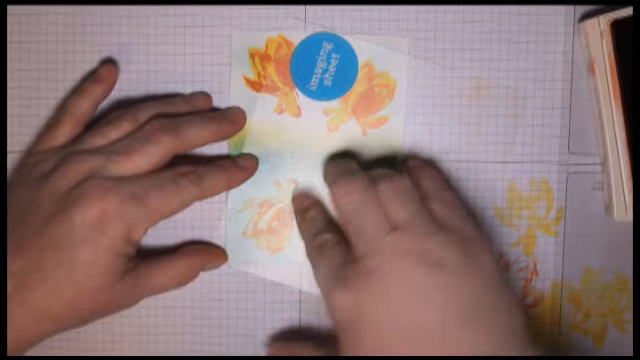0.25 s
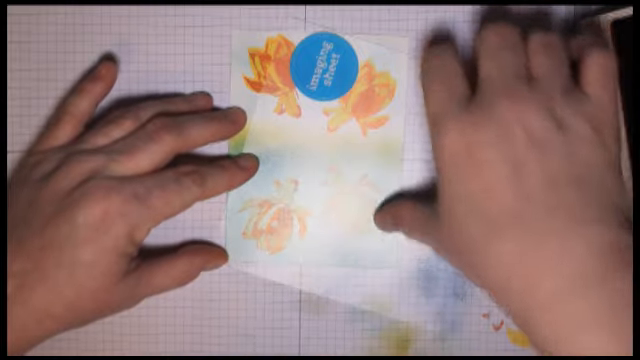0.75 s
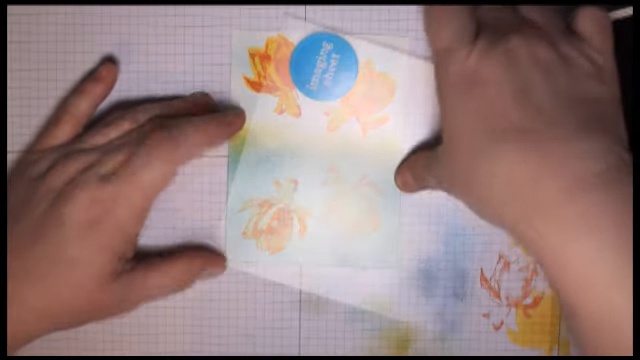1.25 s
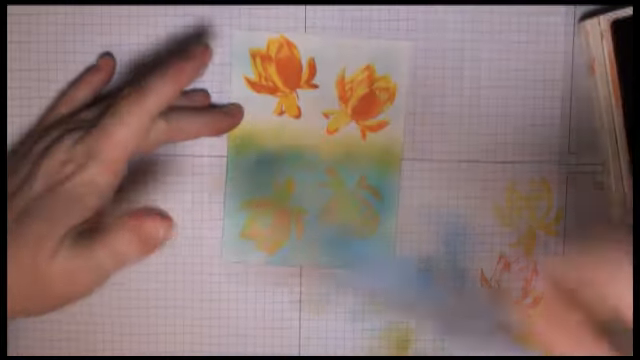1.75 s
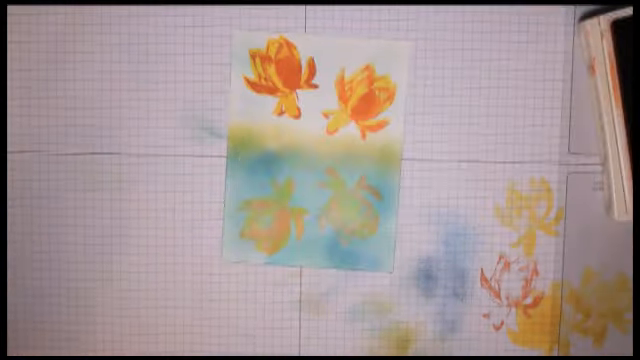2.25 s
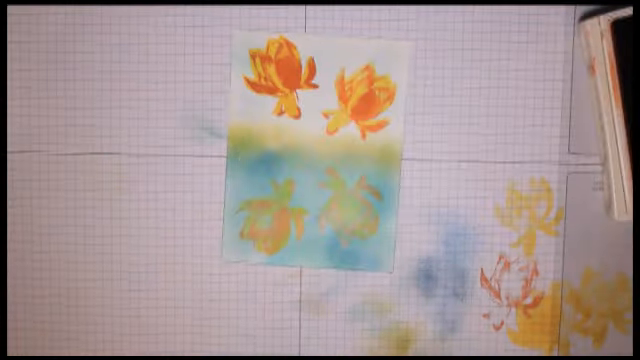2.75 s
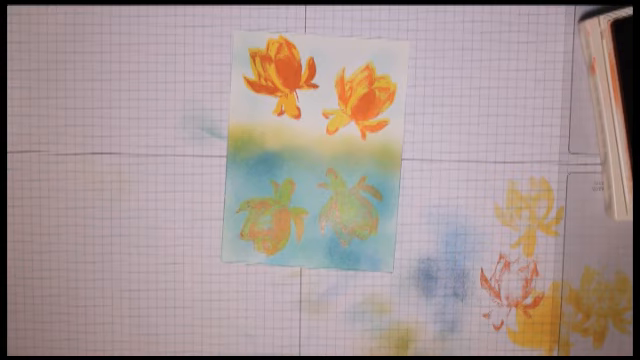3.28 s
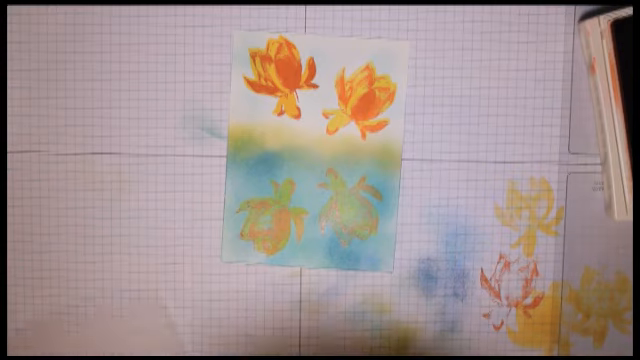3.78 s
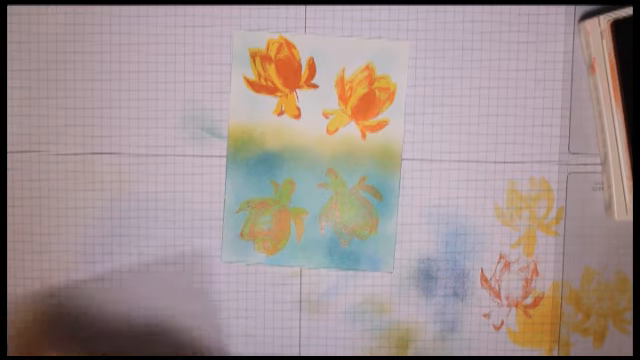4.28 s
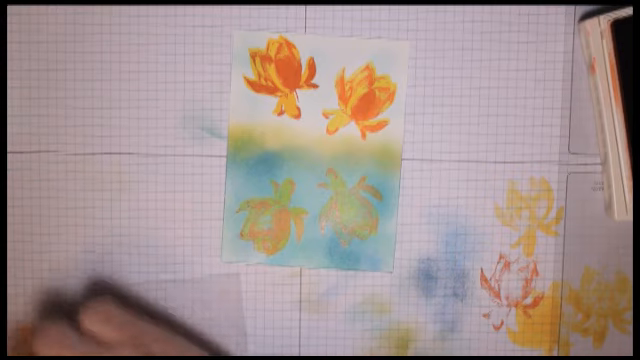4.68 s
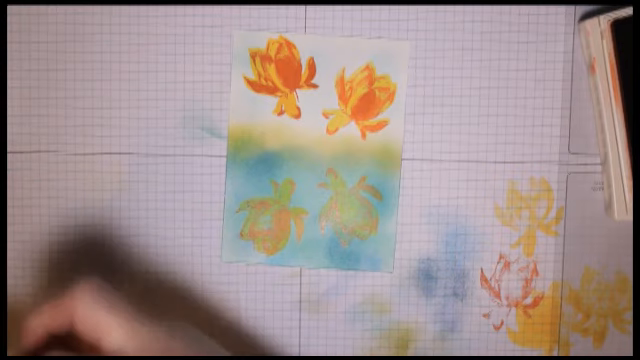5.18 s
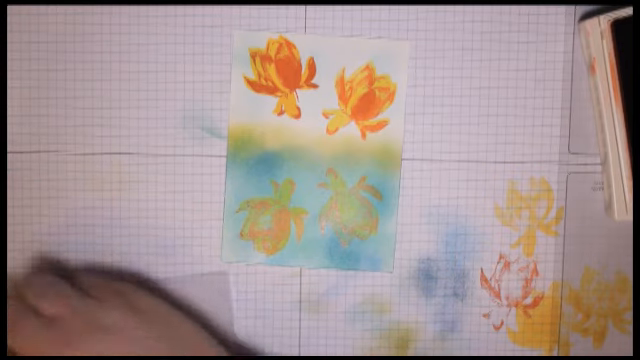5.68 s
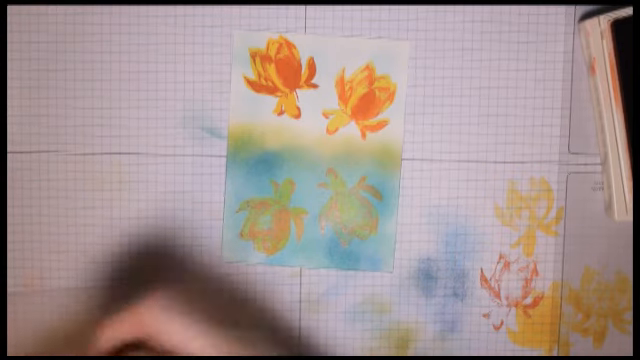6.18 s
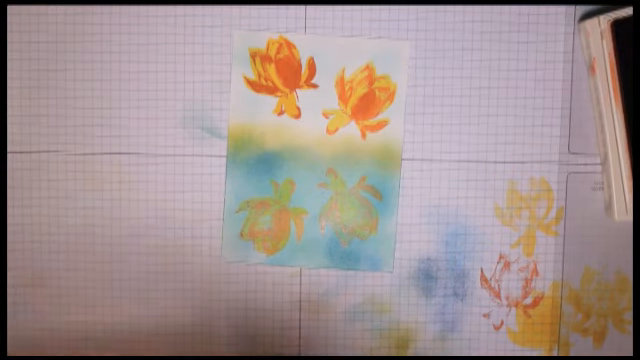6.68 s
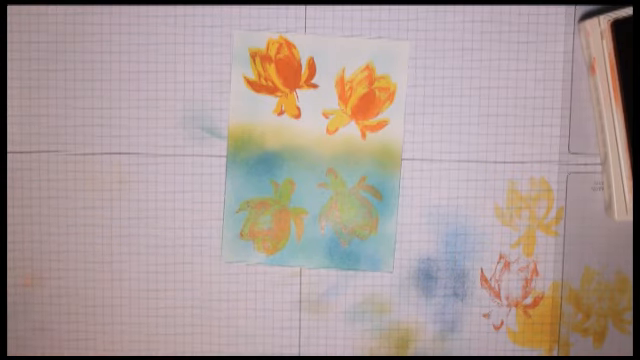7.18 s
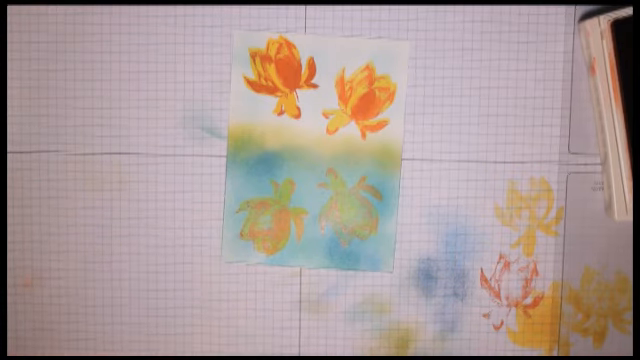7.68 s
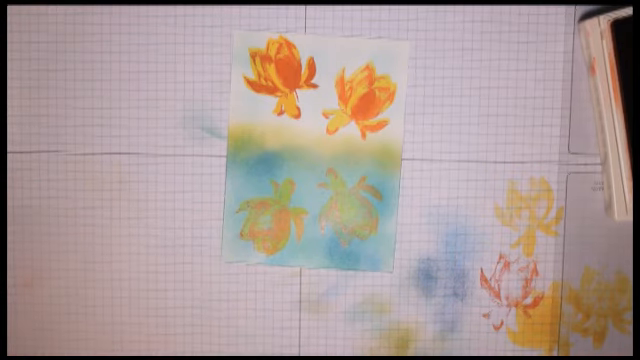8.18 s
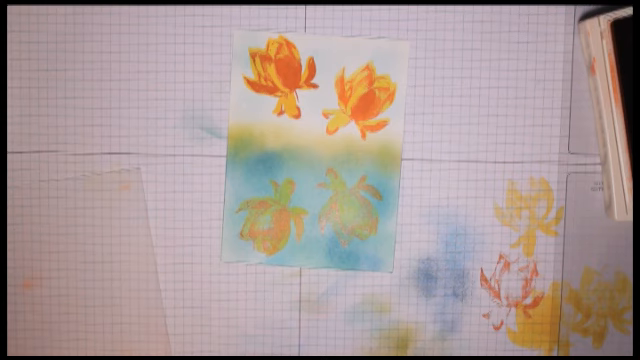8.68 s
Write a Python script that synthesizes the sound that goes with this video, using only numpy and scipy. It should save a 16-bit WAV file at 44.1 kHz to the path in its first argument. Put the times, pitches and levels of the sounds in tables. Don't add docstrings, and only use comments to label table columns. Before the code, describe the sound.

Dry film rustles, ticks and soft knuckle thuds over a faint fan hum, ending with a block set down twice on a hollow tabletop.

```python
import sys
import numpy as np
from scipy import signal
from scipy.fft import rfft, irfft
from scipy.io import wavfile
from scipy.ndimage import uniform_filter1d

SR = 44100
rng = np.random.default_rng(int(sys.argv[2]) if len(sys.argv) > 2 else 0)


def wav_record(signal):
    frames = np.transpose(np.atleast_2d(signal))
    bounded = np.clip(frames, -1, 1)
    quanta = np.round(bounded * 32767).astype(np.int16)
    wavfile.write(sys.argv[1], SR, quanta)


def natural_amplitude(level_db):
    exponent = np.asarray(level_db, float) / 20
    return 10 ** exponent


N = 394232


def unit(x):
    return x / np.sqrt(np.mean(x ** 2))


def fade(seconds, t60):
    return np.exp(-np.log(1000) * seconds / t60)


def ring(x, hz, width_hz):
    return signal.lfilter(*signal.iirpeak(hz, hz / np.clip(width_hz, .5, 9000), fs=SR), x)


def steep(x, hz, width_hz):
    return unit(ring(ring(x, hz, width_hz), hz, width_hz))


def add(out, s, sound):
    i = int(s * SR)
    out[i:i + len(sound)] += sound[:N - i]


def walk(rate):
    k = int(SR / rate)
    held = np.repeat(rng.standard_normal(N // k + 1), k)
    return 1.316 * uniform_filter1d(uniform_filter1d(held, k), k)[:N]


def swell_db(t, s, rise, fall):
    edge_db, roundness = -9.5, 1.43
    return edge_db * np.where(t < s, (s - t) / rise, (t - s) / fall) ** roundness


# pitch_hz, level_db (per Hz)
AIR_COLOUR = [(20, -37), (45, -12), (70, -15.5), (100, 2.5), (125, -7.5), (150, -4), (200, -5.5), (250, -1),
              (360, -10), (560, -7), (1000, -13), (2000, -16), (5000, -29), (12000, -23.5)]
# pitch_hz, level_db (rms), wander_hz
HUM_TONES = [(98.9, -68, 7.12), (118.5, -64, 2.87), (174.8, -59, 1.16), (195.4, -66, 1.85),
             (241.5, -62.5, 5.06), (281, -72.5, 4.1), (573, -69, 30)]


def air(level_db=-54):
    hz = np.fft.rfftfreq(N, 1 / SR)
    colour_hz, colour_db = np.transpose(AIR_COLOUR)
    colour = natural_amplitude(np.interp(np.log(hz + 1), np.log(colour_hz), colour_db))
    rush = unit(irfft(rfft(rng.standard_normal(N)) * colour, N))
    out = rush * natural_amplitude(level_db + .5 * walk(3.4))
    for tone_hz, db, wander_hz in HUM_TONES:
        phase = 2 * np.pi * np.cumsum(tone_hz + wander_hz / 2 * walk(9)) / SR
        out = out + np.sqrt(2) * natural_amplitude(db + 2.6 * walk(6)) * np.sin(phase)
    return out


# centre_hz, span_octaves
RUB_COLOURS = [
    (720, 1.7),
    (2000, 1.2),
    (4400, 1.1),
    (9000, .9),
]
# time_s, level_db
SLEEVE_LEVELS = [(0, -71), (.5, -68.5), (1.0, -65.5), (1.35, -70), (1.7, -72.5), (2.1, -64), (2.35, -67.5),
                 (2.65, -67), (3.4, -67), (4.0, -71.5), (4.7, -65), (5.4, -67.5), (6.0, -64.5),
                 (6.3, -69.5), (7.0, -64), (7.6, -68.5), (8.35, -69), (8.94, -66.5)]
# drag_db, rustle_db, hiss_db, sizzle_db
SLEEVE_COLOUR = (5.8, 1, 8.4, 1.6)
# peak_s, rise_s, fall_s, level_db, brightness_db (per octave)
PRESS_STROKES = [(.09, 0.068, 0.05, -57, -0.5), (.27, 0.022, 0.022, -55, 1),
                 (.315, 0.0092, 0.012, -48, 2.5), (.57, 0.0067, .01, -58.5, 6),
                 (.705, 0.019, 0.035, -42, -1.5), (.83, 0.05, 0.043, -45, -1), (1.11, 0.008, 0.018, -59, 4),
                 (1.162, 0.005, 0.073, -51, 4), (1.505, 0.002, 0.023, -43, 1),
                 (1.545, 0.04, 0.08, -47, 1.5), (1.63, 0.013, 0.022, -46, 0.5),
                 (1.82, 0.31, 0.15, -57.5, 4), (2.723, 0.019, 0.013, -45.5, 6),
                 (2.784, 0.012, 0.0079, -45, 4), (2.83, 0.03, 0.05, -59, 3),
                 (2.96, 0.097, 0.058, -60.5, -0.5)]
LAY_STROKES = [(3.09, 0.031, 0.061, -54, 0.55), (3.203, 0.01, .015, -52, 0), (3.26, 0.074, 0.1, -52.5, 1.8),
               (3.45, 0.012, 0.029, -59, 3), (3.56, 0.053, 0.13, -50, -0.6), (3.655, .025, 0.031, -49, 2.5),
               (3.69, .12, 0.11, -52.5, -1), (3.76, 0.067, 0.1, -49.5, 0.5),
               (3.885, 0.024, 0.022, -55.5, 3), (3.925, 0.028, 0.058, -48, -0.5),
               (4.05, 0.063, 0.051, -48, -1.7), (4.12, .03, .03, -60, 1.1),
               (4.16, 0.027, 0.041, -49.5, 0.5), (4.235, 0.05, 0.094, -47.5, -0.7),
               (4.35, 0.0052, 0.042, -53.5, 0.22), (4.445, 0.014, 0.061, -51, -2)]
WIPE_STROKES = [(4.64, 0.0082, 0.27, -63.5, 5), (4.88, 0.036, 0.058, -52.5, 0), (5.01, 0.036, .02, -58, 0),
                (5.09, 0.011, 0.06, -57.5, 3), (5.19, 0.037, 0.023, -57.5, 2.5), (5.32, .04, 0.054, -52, 0),
                (5.48, 0.029, 0.054, -55.5, -6.5), (5.63, 0.083, 0.085, -60, 1.5),
                (5.795, 0.048, 0.063, -49, 1.5), (5.9, .01, 0.012, -54.5, 2),
                (6.03, 0.032, 0.051, -56.5, -3), (6.16, 0.034, 0.034, -56, 0.5),
                (6.39, 0.068, 0.061, -54, 1), (6.485, 0.042, 0.028, -48, 1.5),
                (6.73, 0.099, 0.12, -57, -1.5), (6.87, 0.026, 0.034, -44.5, 1.5),
                (7.08, 0.03, 0.032, -52.5, 5)]
TIDY_STROKES = [(7.22, 0.03, 0.027, -60, -6), (7.305, 0.055, 0.051, -44, -1.5),
                (7.315, 0.018, 0.038, -50.5, 10), (7.36, 0.028, 0.032, -39.5, -2),
                (7.44, 0.023, 0.04, -52.5, -4), (7.7, 0.034, 0.039, -46, 0.5),
                (7.968, 0.0092, 0.036, -40.5, -0.5), (8.03, 0.036, 0.032, -57, -2),
                (8.09, 0.035, 0.026, -44, 0), (8.17, 0.074, 0.097, -47.5, -0.5),
                (8.235, 0.015, 0.021, -47.5, 2.5), (8.52, 0.1, 0.067, -59, 1),
                (8.64, 0.068, 0.023, -59.5, 6), (8.76, 0.032, 0.024, -57, -1),
                (8.92, 0.14, .03, -58.5, 0.5)]


def friction():
    t = np.arange(0, N / SR, .002)
    octave = np.log2(np.array(RUB_COLOURS)[:, :1] / 4400)
    sleeves_db = np.interp(t, *np.transpose(SLEEVE_LEVELS))
    power = natural_amplitude(sleeves_db + np.reshape(SLEEVE_COLOUR, (4, 1))) ** 2
    activities = ((PRESS_STROKES, (-1, 1, 0, -1)), (LAY_STROKES, (-11.5, 0, 0, 2)),
                  (WIPE_STROKES, (-12.5, -1.5, 0.5, 0.5)), (TIDY_STROKES, (-9, -0.5, 2.5, 0)))
    for strokes, colour_db in activities:
        for s, rise, fall, db, tilt_db in strokes:
            stroke_db = db + swell_db(t, s, rise, fall)
            power = power + natural_amplitude(stroke_db + np.reshape(colour_db, (4, 1)) + tilt_db * octave) ** 2
    return t, 10 * np.log10(power)


# pitch_hz, width_hz, level_db
SHEET_MODES = [(700, 29, 1.5), (1500, 420, -5), (2880, 150, -15), (4030, 140, 1), (5170, 250, -3)]
# time_s, level_db
PRESSED_LEVELS = [(.66, -40), (.69, -13), (.765, -16), (.86, -13), (.9, -40)]


def rubbing(grain_db=2.5, patchy_db=2.2, hush_db=-40):
    s, colours_db = friction()
    centres, octaves = np.transpose(RUB_COLOURS)
    density_db = colours_db.T - 10 * np.log10(octaves)
    t = np.arange(N) / SR
    catch_db = grain_db * np.minimum(rng.exponential(size=N), 6)
    grains = natural_amplitude(catch_db + 1.45 * walk(55))
    pressed = natural_amplitude(np.interp(t, *np.transpose(PRESSED_LEVELS)))
    out = 0
    for hz in 450 * 2 ** np.arange(0, 4.9, 1 / 3):
        film = steep(grains * rng.standard_normal(N), hz, hz / 3)
        squeak = sum(natural_amplitude(g) * ring(film, f, w) * np.sqrt(hz / w)
                     for f, w, g in SHEET_MODES if abs(np.log2(f / hz)) < 1 / 6)
        shares = [np.interp(np.log(hz), np.log(centres), share) for share in np.eye(4)]
        level = natural_amplitude(np.interp(t, s, density_db @ shares) + patchy_db * walk(22))
        out = out + (film * natural_amplitude(hush_db * pressed) + pressed * squeak) * level
    return natural_amplitude(-7) * out


# start_s, peak_db, low_mode_hz, t60_s, body_db
THUD_HITS = [(0.308, -41, 251, 0.077, -7), (1.19, -42.5, 248, 0.15, -2.5), (1.85, -45, 267, 0.37, -17),
             (2.027, -34.5, 95, 0.045, -6.5), (2.399, -42, 81, 0.1, -24), (2.808, -45.5, 177, 0.13, -7.5),
             (3.798, -38.5, 105, 0.24, -20), (4.146, -42.5, 124, 0.28, -16), (4.242, -34.5, 135, 0.087, -8),
             (4.251, -39.5, 270, 0.14, -5), (5.45, -44, 115, 0.11, -20), (6.332, -37.5, 137, 0.13, -15),
             (6.498, -40.5, 110, 0.087, -0.5), (6.903, -36.5, 206, 0.13, 0), (7.263, -26.5, 154, 0.15, -9),
             (7.319, -22.5, 297, 0.041, -4), (7.438, -36, 255, 0.083, 11.5), (7.969, -37, 141, 0.064, -6),
             (8.206, -37, 113, 0.22, -9.5)]


def thuds(rise_s=0.0024, body_hz=408):
    out, t = np.zeros(N), np.arange(int(.3 * SR)) / SR
    for s, db, hz, t60, body_db in THUD_HITS:
        body = steep(rng.standard_normal(len(t)), body_hz, 0.76 * body_hz)
        swing = np.sin(2 * np.pi * hz * t) + natural_amplitude(body_db) * body
        add(out, s, natural_amplitude(db) * swing * (1 - np.exp(-t / rise_s)) * fade(t, t60))
    return out


# start_s, peak_db, ring_hz, breadth (share of ring_hz), rustle_db
EDGE_TICKS = [(0.31, -34.5, 1130, 0.87, -11), (0.57, -33, 3790, 0.92, -25),
              (1.191, -26.5, 1600, 1.3, -11.5), (1.464, -46, 1800, .5, -12), (1.5015, -21, 1500, 2.6, -21),
              (1.842, -38.5, 3630, 0.8, -9), (2.026, -31.5, 1840, 1.2, -14), (2.712, -34, 2140, .8, -6),
              (3.349, -37.5, 1760, 1.3, -11), (3.531, -35, 2370, 1.4, -11), (3.567, -40, 2500, 2, -16),
              (3.635, -34, 3000, 2.5, -18), (3.801, -33, 4000, 2, -15), (3.974, -32, 4000, 2.5, -21),
              (4.015, -36, 9000, .6, -8), (4.175, -38, 3000, 2.3, -16), (4.474, -34.5, 1230, 1.2, -9),
              (5.815, -40.5, 1910, 0.8, 2.5), (6.6425, -43, 1770, 1, -9), (7.148, -33, 3600, 0.6, -16),
              (7.948, -28.5, 2370, 0.85, -29), (7.9638, -14.5, 3000, 1.9, -19.5),
              (8.606, -32.5, 1040, 0.91, -15)]
FILM_SNAPS = [(1.396, -35, 2300, 0.58, -3), (1.3965, -38.5, 6500, 0.6, -10), (2.6885, -23, 7000, 1.2, -9),
              (2.7685, -27, 6000, 1.3, -22), (2.784, -38, 1690, .8, -12), (4.1525, -37, 4000, 2.5, -30),
              (7.3215, -22, 1900, 0.51, 0.5)]
NAIL_SCRAPES = [(4.353, -34.5, 3060, 1.1, -16), (7.1725, -30, 2860, 3.9, -10.5),
                (7.263, -27, 980, 0.87, -12.5)]


def ticks(late_s=0.000976):
    out, t = np.zeros(N), np.arange(int(.2 * SR)) / SR
    for rows, rustle_t60 in ((EDGE_TICKS, 0.058), (FILM_SNAPS, 0.037), (NAIL_SCRAPES, 0.13)):
        for s, db, hz, breadth, rustle_db in rows:
            noise = rng.standard_normal((2, len(t)))
            snap = noise[0] * fade(t, .008) / 8
            snap[0] = -1
            snap = ring(snap, hz, hz * breadth)
            rustle = steep(noise[1], hz, 1.03 * hz * breadth) * fade(t, rustle_t60)
            add(out, s + late_s, natural_amplitude(db) * (snap / np.abs(snap).max() + natural_amplitude(rustle_db) * rustle))
    return out


# peak_s, rise_s, fall_s, level_db, pitch_hz
FOLD_CREASES = [(.848, 0.01, 0.019, -47.5, 1410), (1.551, 0.038, 0.04, -50.5, 1770),
                (1.618, 0.0049, 0.023, -46, 1090), (1.629, 0.0087, .009, -40.5, 3830),
                (1.649, .004, .004, -47, 3500), (3.084, 0.031, 0.026, -53, 4200),
                (3.655, .02, .02, -48, 10500), (4.05, .03, .02, -52, 5500), (3.93, .015, 0.029, -45, 9700),
                (5.79, 0.044, 0.033, -51, 5430), (6.335, 0.014, 0.018, -52.5, 2450),
                (7.176, 0.003, 0.023, -38.5, 1990), (7.176, 0.0026, 0.012, -34, 4200),
                (7.685, 0.017, .02, -48.5, 2270), (8.173, .008, .006, -47, 2000),
                (8.19, 0.01, 0.014, -42, 2070), (8.226, 0.013, 0.012, -44.5, 4200)]
FILM_SQUEAKS = [(.7, .012, .03, -50, 2900), (.708, .015, .025, -55, 4000), (.72, .025, .025, -52, 1600),
                (.715, .02, .02, -59, 5400), (.7, .01, .04, -52, 700), (.797, .008, .012, -55, 2900),
                (.82, .03, .025, -57, 4000), (.825, .015, .02, -50, 5300), (.85, .008, .01, -52, 1900),
                (.82, .008, .025, -51, 700), (.832, .01, .012, -56, 2900), (.8, .012, .02, -55, 1500),
                (.845, .01, .012, -54, 2300), (.85, .012, .015, -50, 340), (1.545, .025, .015, -48, 1900),
                (1.571, .004, .004, -48, 1600)]
FILM_CRACKLES = [(1.464, .003, .004, -51, 1900), (1.47, .003, .003, -55, 2600),
                 (3.181, .003, .003, -51, 9500), (3.2, .005, 0.019, -51, 3600),
                 (3.2, .006, .012, -52, 4600), (3.243, .006, .004, -47, 9000),
                 (3.265, .008, .012, -53, 9300), (3.27, .01, .015, -53, 3500),
                 (3.352, .004, .006, -48.5, 11000), (3.352, .004, .005, -52, 3000),
                 (4.862, .005, .01, -56, 4400), (4.885, .02, .02, -57, 3600), (4.89, .015, .01, -55, 6000),
                 (5.005, .01, .025, -55.5, 1700), (6.648, .003, .012, -50, 3320),
                 (6.646, .002, .014, -54, 1700), (6.67, .025, .06, -58, 11000),
                 (7.18, .008, .015, -49, 10800), (7.19, 0.0073, 0.014, -39, 4100),
                 (7.185, 0.011, .015, -45.5, 5140), (7.187, .008, .015, -43, 1890),
                 (8.11, .04, .05, -54, 4300), (8.24, .012, .012, -47, 2900)]


def creases():
    out, t = np.zeros(N), np.arange(-4000, 4000) / SR
    for rows, breadth in ((FOLD_CREASES, .26), (FILM_SQUEAKS, .12), (FILM_CRACKLES, .26)):
        for s, rise, fall, db, hz in rows:
            band = steep(rng.standard_normal(len(t)), hz, breadth * hz)
            add(out, s + t[0], band * natural_amplitude(db + swell_db(t, 0, rise, fall)))
    return out


# start_s, peak_db, pitch_hz, contact_s
CONTACT_MODES = [
    (1.3955, -33, 1190, .005),
    (1.3957, -37, 2130, .004),
    (1.396, -37, 2500, .004),
    (1.396, -40, 3600, .004),
    (7.3171, -9.5, 640, .0045),
    (7.32, -7, 1180, .0046),
    (7.3215, -16, 760, .003),
    (7.3228, -18, 1750, .003),
]


def landing():
    out = np.zeros(N)
    for s, db, hz, contact in CONTACT_MODES:
        t = np.arange(int(contact * SR)) / SR
        swell = np.sqrt(np.sin(np.pi * t / contact))
        add(out, s, -natural_amplitude(db) * np.sin(2 * np.pi * hz * t) * swell)
    return out


# start_s, peak_db, pitch_hz, rise_s, t60_s
TOP_RINGS = [(1.5024, -27, 900, .0004, 0.014), (2.0268, -28, 500, 0.00088, 0.019),
             (4.48, -44, 330, .003, .1), (4.253, -38, 402, .003, 0.14), (6.905, -40, 400, .003, 0.13),
             (6.91, -46, 220, .003, 0.1), (7.263, -33, 570, 0.001, 0.11), (7.316, -40, 45, .004, 0.16),
             (7.319, -24, 294, 0.0018, 0.049), (7.44, -26, 378, .003, 0.083), (7.441, -39, 91, .004, .15),
             (7.3175, -16.5, 368, 0.0023, 0.049), (7.375, -27, 1210, .003, .08),
             (7.3253, -19, 1200, 0.0022, 0.056), (7.439, -15, 1130, 0.0024, 0.045),
             (7.44, -19, 750, .003, 0.059), (7.453, -22, 1130, .004, .07), (7.462, -26.5, 490, 0.0049, .16),
             (7.445, -19, 520, .002, .04), (7.474, -23, 780, .003, .07), (7.512, -30, 1050, .004, .09),
             (7.508, -33, 740, .006, 0.12), (7.533, -33, 1204, .003, 0.045)]
STIFF_FILM_RINGS = [(1.399, -42, 1194, .001, .04), (6.6432, -35, 2600, .0003, .01),
                    (2.6935, -24, 700, .0002, .006), (2.6952, -28, 2000, .0002, .005),
                    (2.6983, -29, 600, .0002, .007), (2.7128, -28, 2000, .0003, .008),
                    (2.7142, -29, 800, .0003, .008), (2.7692, -29, 1000, .0002, .006),
                    (2.7692, -29, 4600, .0002, .005), (2.7847, -27, 1300, .0002, .005),
                    (2.7847, -30, 3300, .0002, 0.0045), (4.475, -40, 1700, .0005, .02),
                    (7.149, -38, 4500, .0005, .02), (7.1728, -27, 4330, .0003, .012),
                    (7.2632, -30, 1000, .0003, .015)]
# start_s, peak_db, contact_s, ring_db
SHEET_SLAP = (2.6897, -6, .00024, -27)
# pitch_hz, level_db, t60_s
SLAP_MODES = [(247, -8, 0.13), (462, -6, 0.11), (710, -2, 0.07), (970, 5, 0.014), (1060, 3, 0.03),
              (1810, 1, 0.031), (2040, -4, 0.065), (2180, -13, 0.055), (2300, -2, 0.053), (3710, -7, 0.041)]


def rings():
    out, t = np.zeros(N), np.arange(int(.25 * SR)) / SR
    for s, db, hz, rise, t60 in [*TOP_RINGS, *STIFF_FILM_RINGS]:
        swell = (1 - np.exp(-t / rise)) * fade(t, t60)
        add(out, s, -natural_amplitude(db) * np.sin(2 * np.pi * hz * t) * swell)
    s, db, contact, ring_db = SHEET_SLAP
    push = -np.sin(np.pi * np.clip(t / contact, 0, 1)) ** 2
    modes = sum(natural_amplitude(g) * np.sin(2 * np.pi * hz * t) * fade(t, decay) for hz, g, decay in SLAP_MODES)
    push = push + natural_amplitude(ring_db) * signal.fftconvolve(push, modes)[:len(t)] / (contact * SR / 2)
    no_bass = signal.butter(2, 220, "highpass", fs=SR, output="sos")
    add(out, s, natural_amplitude(db) * signal.sosfilt(no_bass, push))
    return out


# start_s, peak_db, sweep_start_hz, sweep_end_hz, sweep_s
BLOWS = [
    (2.6892, -40, 800, 900, 0.0007),
    (7.3215, -22, 1600, 3000, 0.003),
    (7.4395, -18, 550, 1290, 0.0069),
]
# level_db, t60_s
BLOW_RATTLES = [
    (-21, 0.013),
    (-19.5, 0.085),
    (-23, 0.065),
]
# pitch_hz, level_db, t60_s
FIRST_BLOW_MODES = [(145, 3, 0.062), (394, 3, 0.13), (487, -9, 0.14), (655, 3.5, 0.15), (850, -25, 0.25),
                    (950, -5, .2), (1210, -4, 0.29), (1500, -6, 0.15), (1770, 1.5, 0.09),
                    (2196, -3.5, 0.12), (2500, -8, 0.14), (2860, -12, 0.087)]
SECOND_BLOW_MODES = [(248, -8, 0.17), (415, 3, 0.088), (494, 4, 0.2), (613, 3.5, 0.2), (734, 3, 0.28),
                     (970, -11, 0.71), (1060, 1.5, 0.26), (1145, 1.5, 0.33), (1380, -4.5, 0.29),
                     (1425, -8, 0.3), (1760, 5, 0.047)]


def knocks(broad_db=-1, rough_hz=170, dead_hz=922, dead_width_hz=430):
    out, t = np.zeros(N), np.arange(int(.5 * SR)) / SR
    mode_sets = (SLAP_MODES, FIRST_BLOW_MODES, SECOND_BLOW_MODES)
    for blow, modes, (rattle_db, t60) in zip(BLOWS, mode_sets, BLOW_RATTLES):
        s, db, start_hz, end_hz, length = blow
        part = np.clip(t / length, 0, 1)
        pitch = start_hz * (end_hz / start_hz) ** part
        sweep = -np.sin(2 * np.pi * np.cumsum(pitch) / SR) * np.sin(np.pi * part)
        if start_hz < dead_hz:
            sweep = sweep - ring(sweep, dead_hz, dead_width_hz)
        noise = rng.standard_normal(2 * len(t))
        rattle = sum(natural_amplitude(g) * steep(noise, hz, rough_hz)[len(t):] * fade(t, decay)
                     for hz, g, decay in modes)
        rattle = rattle + natural_amplitude(broad_db) * steep(noise, 1770, 660)[:len(t)] * fade(t, t60)
        add(out, s, natural_amplitude(db) * sweep + natural_amplitude(rattle_db - 9.0) * rattle * part)
    return signal.sosfilt(signal.butter(3, (70, 3100), "bandpass", fs=SR, output="sos"), out)


def room(x, t60_s=0.5, level_db=-18.5):
    t = np.arange(int(.5 * SR)) / SR
    tail = ring(rng.standard_normal(len(t)), 630, 6300) * fade(t, t60_s) * (t > .004)
    tail = tail / np.sqrt(np.sum(tail ** 2))
    return x + natural_amplitude(level_db) * signal.fftconvolve(x, tail)[:N]


def scene():
    hits = ticks() + knocks() + thuds() + rings() + landing()
    mono = room(hits) + rubbing() + air() + creases()
    return np.array([mono, mono])


def roll_off(x):
    return signal.sosfilt(signal.butter(12, 13050, fs=SR, output="sos"), x)


def record(dry, top_hz=11850, flicker_hz=12030, leak_db=22):
    treble_band = signal.butter(6, (4800, 10500), "bandpass", fs=SR, output="sos")
    treble = signal.sosfilt(treble_band, dry[0])
    parted_treble = natural_amplitude(-7) * treble * np.clip(2 * walk(40) - 3.2, 0, 1)
    both = dry + np.array([parted_treble, -parted_treble])
    narrow, wide = (signal.sosfiltfilt(signal.ellip(8, .2, leak_db, hz, fs=SR, output="sos"), both)
                    for hz in (top_hz, flicker_hz))
    mix = narrow + (wide - narrow) * np.clip(walk(45), 0, 1)
    return roll_off(mix)


dry = scene()
out = record(dry)
wav_record(out)
```